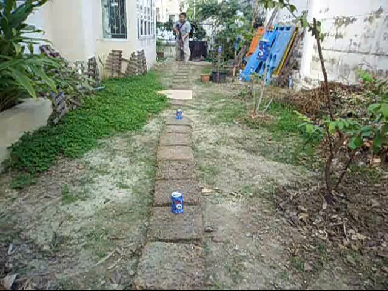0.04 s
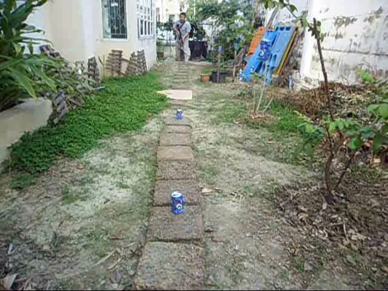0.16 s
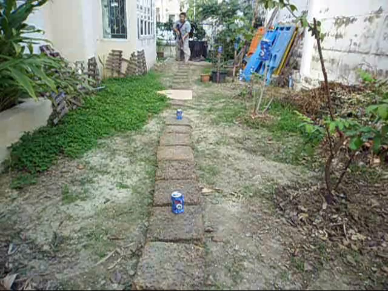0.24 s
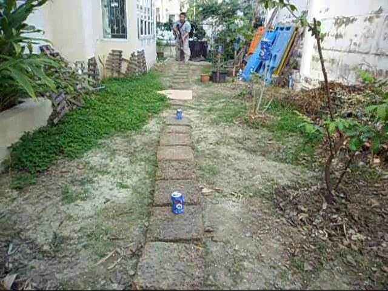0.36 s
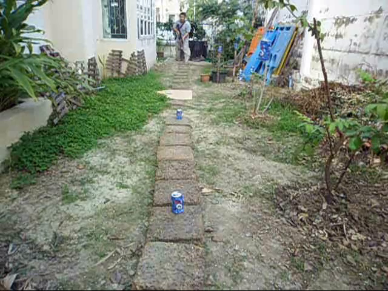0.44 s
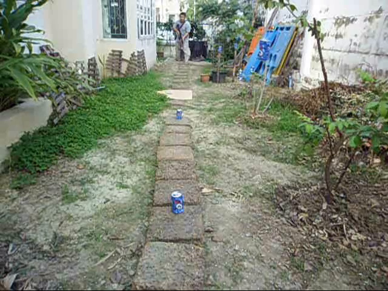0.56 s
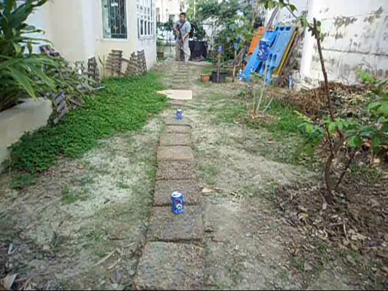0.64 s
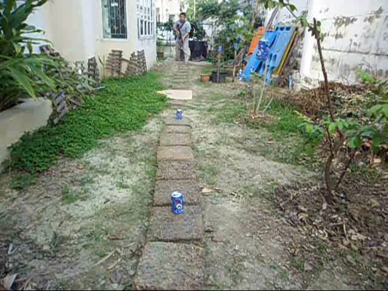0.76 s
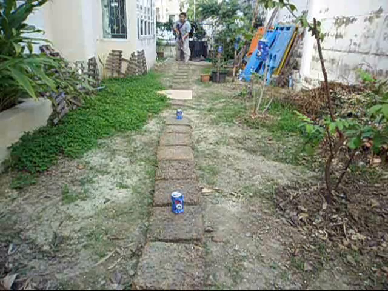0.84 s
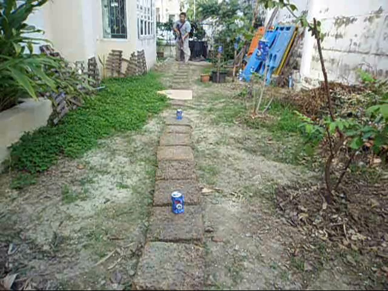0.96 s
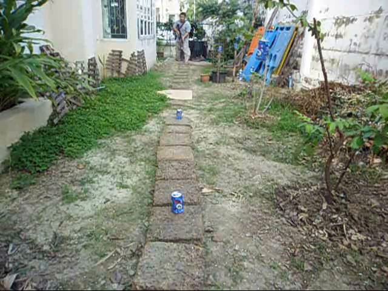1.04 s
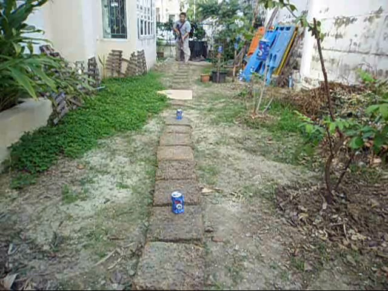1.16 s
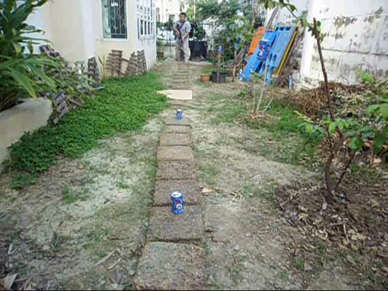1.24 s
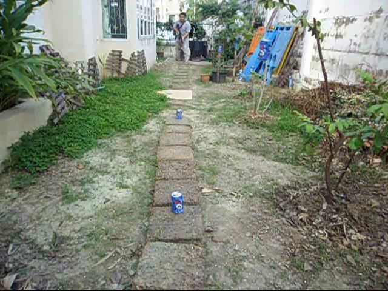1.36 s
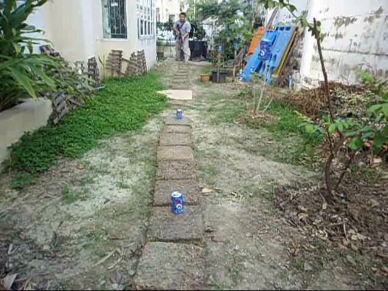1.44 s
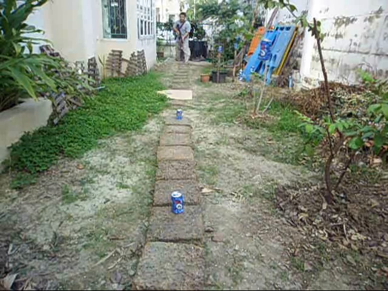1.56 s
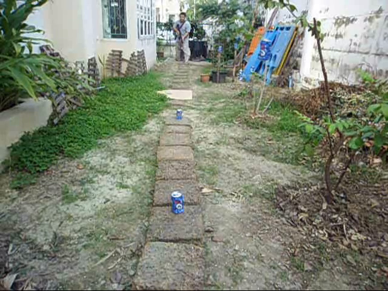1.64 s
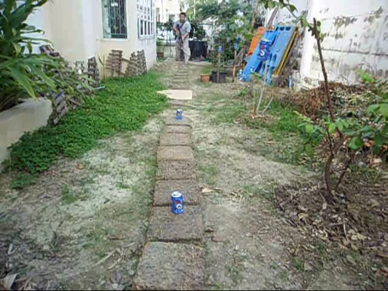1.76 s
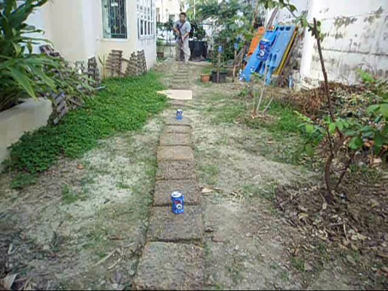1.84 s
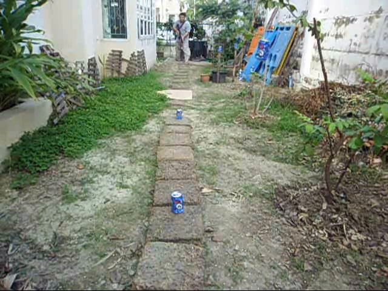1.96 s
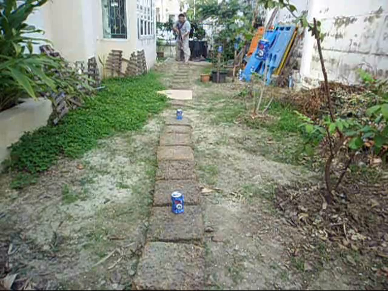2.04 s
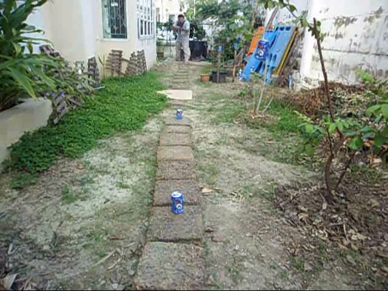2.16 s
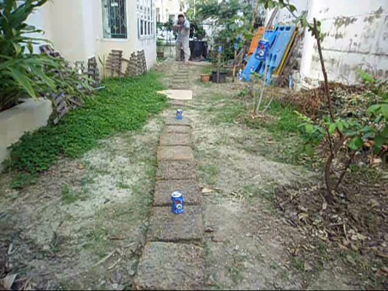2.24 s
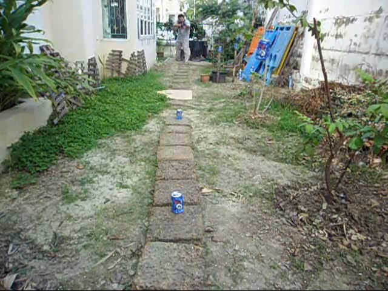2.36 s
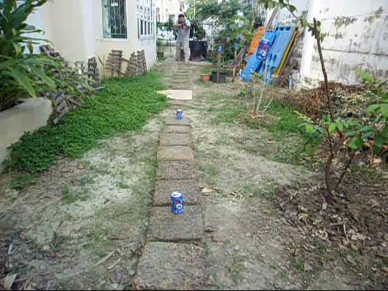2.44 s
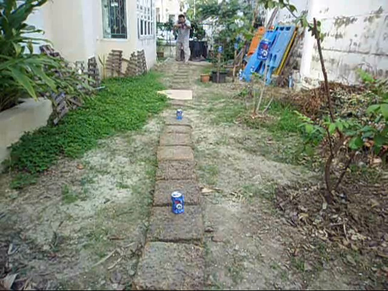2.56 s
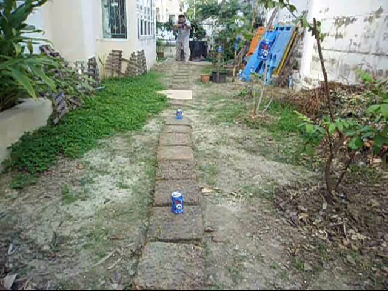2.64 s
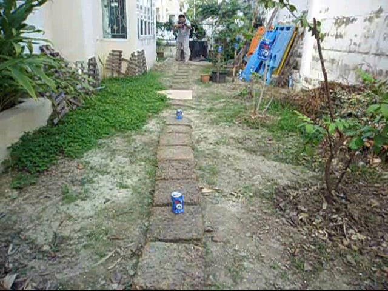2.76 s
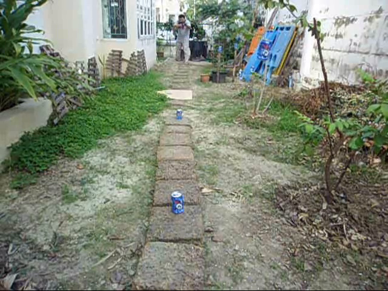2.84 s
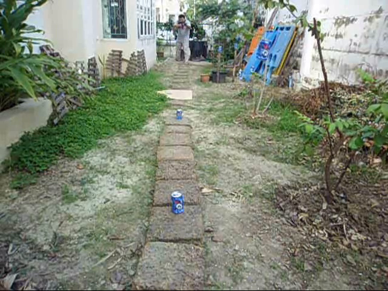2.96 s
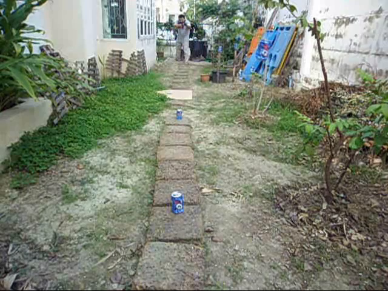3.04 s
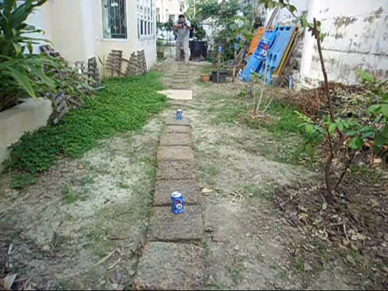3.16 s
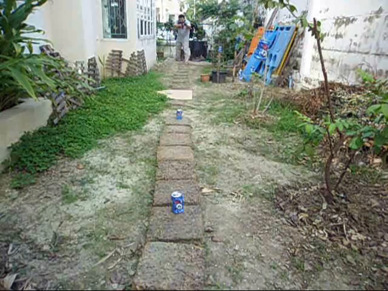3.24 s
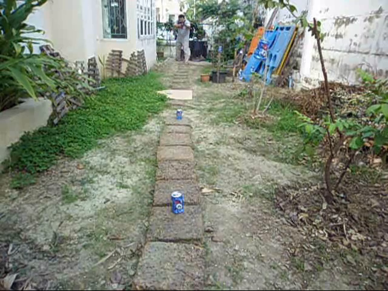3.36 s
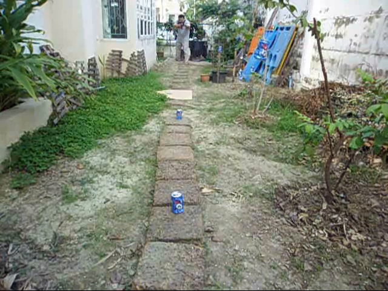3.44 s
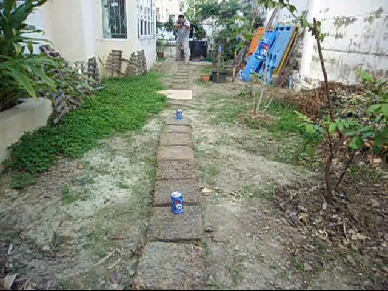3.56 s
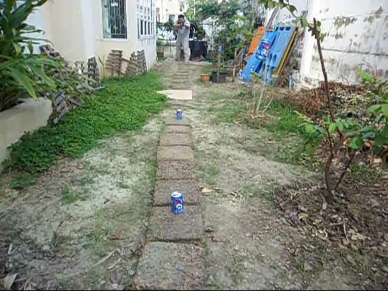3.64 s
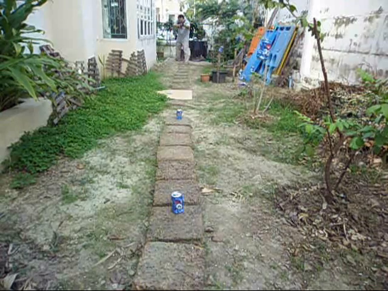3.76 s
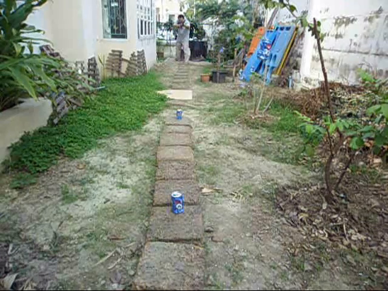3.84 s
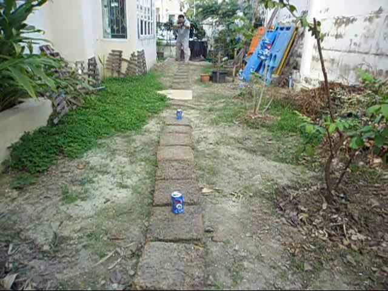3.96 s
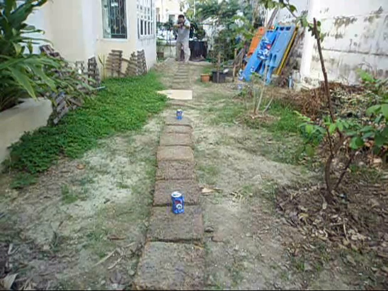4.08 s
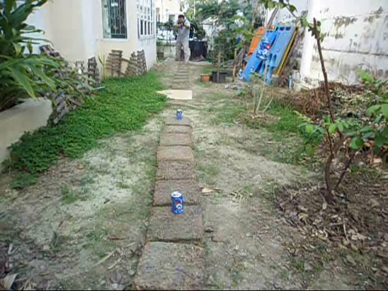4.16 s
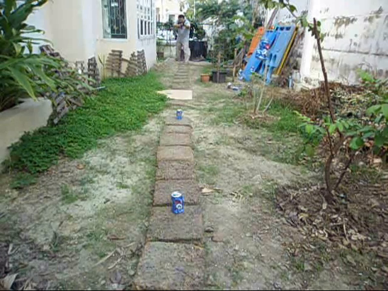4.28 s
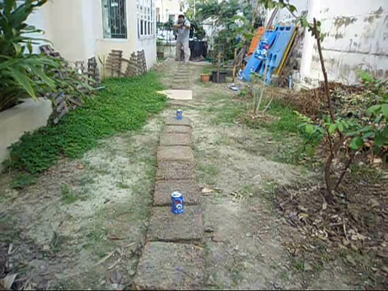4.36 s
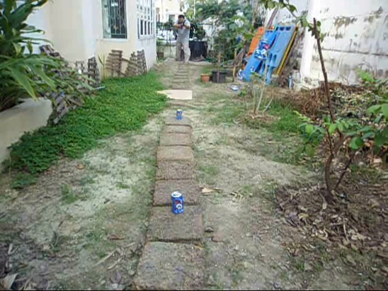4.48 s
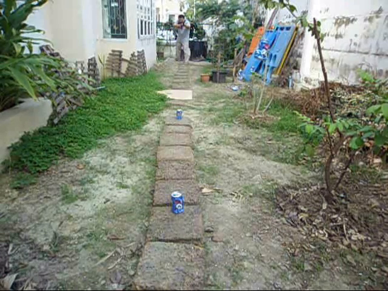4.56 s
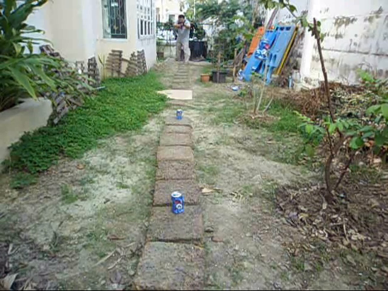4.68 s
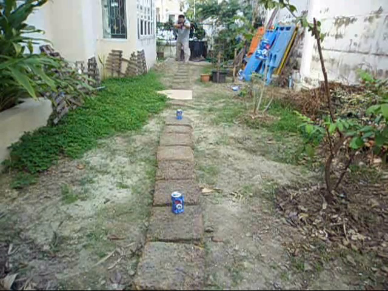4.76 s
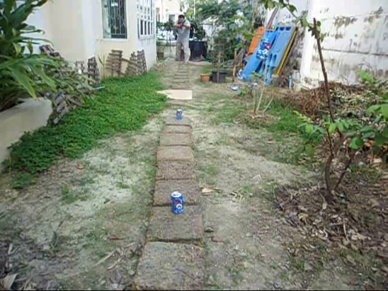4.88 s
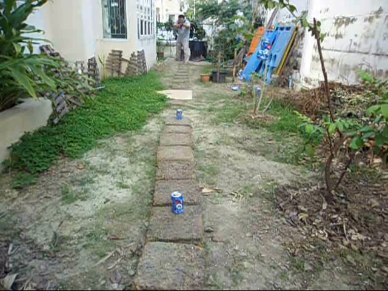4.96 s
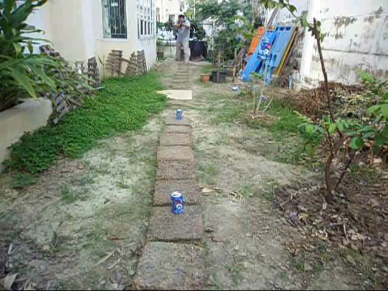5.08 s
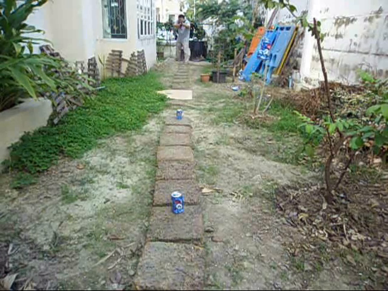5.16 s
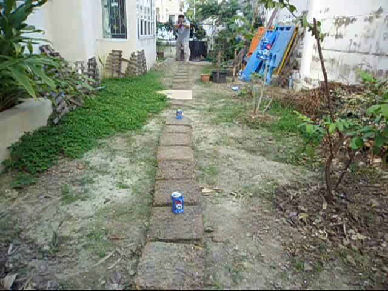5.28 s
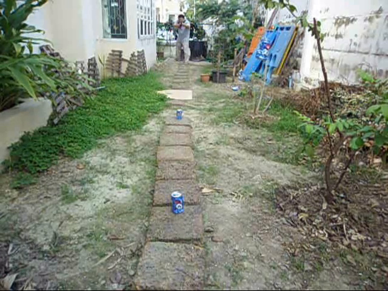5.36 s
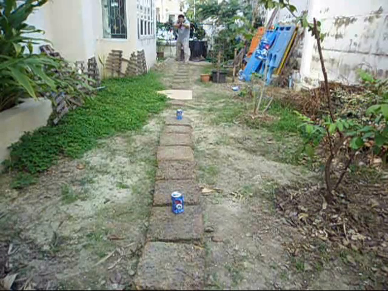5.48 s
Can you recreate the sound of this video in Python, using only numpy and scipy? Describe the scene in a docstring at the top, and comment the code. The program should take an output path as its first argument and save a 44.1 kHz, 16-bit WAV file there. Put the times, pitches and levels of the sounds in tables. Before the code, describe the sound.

A steady low hum with a thin distant whirr and faint rumble fills a quiet yard. Quiet handling follows: sliding cloth, one creak, tiny high clinks. From past three seconds come five loud, spaced airsoft shots, with pellets cracking against cans and boards almost at once after the first four, and loose tinny clatter. Short echoes bounce off walls; the mono sound is gritty, overloaded and harsh in the treble.

```python
"""A machine hums nearby, with a thin far whirr, a low rumble and outdoor air, all filtered noise and wavering tones.
As an electric airsoft rifle is raised, cloth rustles, the strap creaks and the sling buckle clinks.
Then come five single shots down a narrow yard: gear noise swells as the motor winds the spring, the piston slams,
pellets smack cans and boards after the first four, knocked cans clatter, and the walls ring on as decaying noise.
A cheap mono recorder overloads on the loud blows and mirrors its treble."""
import sys
import numpy as np
from scipy import signal
from scipy.io import wavfile
from scipy.ndimage import uniform_filter1d

SR = 44100
rng = np.random.default_rng(int(sys.argv[2]) if len(sys.argv) > 2 else 0)


def ratio(d):
    """dB to gain"""
    e = np.asarray(d, float) / 20
    return 10 ** e


def put_to_file(sound):
    """Save the sound as 16-bit audio at rate SR, in the file named by the first command-line argument."""
    columns = np.atleast_2d(sound).T  # one column per channel
    safe = np.clip(columns, -1, 1)
    whole_steps = np.round(safe * 32767)
    wavfile.write(sys.argv[1], SR, whole_steps.astype(np.int16))


N = 242991   # length [samples]

# The four blow tables share their columns, levels before the boost of their kind:
# (time [s], level [dB], brightness [dB per octave], wall echo [dB], favoured ring [Hz])
# piston slams
SLAMS = [(3.328, 3, 5, 0, 4570), (3.857, -1.5, 7.5, 1.5, 5800), (4.301, 1, 2, -3, 4270),
         (4.723, 8, 4.5, -12.5, 6000), (5.481, 2, 2.5, -5, 4900)]
# pellet strikes
STRIKES = [(3.348, 4.5, 2.5, -5.5, 1260), (3.875, 5.5, 2.5, -2.5, 3800), (4.342, -3.5, 3, -5, 3400),
           (4.752, 5.5, 1.5, -3.5, 1630)]
# knocked cans clattering
CLATTER = [(3.585, -9, 6, -17, 2300), (3.619, -15, 9, -30, 5400), (3.639, -11, 6, -1.5, 2600),
           (3.66, -18, -4.5, -5.5, 3170), (3.779, -4, 0.5, -4, 890), (3.786, -3, 3.5, -1, 3900),
           (3.821, -4.5, 2, -19, 5700), (4.328, -12, -6.5, -15, 1600), (4.385, -23, -7, -1, 3400),
           (4.612, -13.5, 0.5, 0, 1066), (5.176, -12, 5, -3, 2110), (5.239, -15.5, -7, -3.5, 980)]
# sling buckle clinks
CLINKS = [(2.357, -29.5, 7.5, -15, 3500), (2.402, -31, -2, -8, 6700), (2.622, -37, 1.5, -12, 5200),
          (2.795, -45, -6, 1, 4520), (2.866, -37, 4, -18, 7200)]
# motor winding before each slam: (start [s], whine peak [dB])
TRIGGERS = [(3.265, -22.5), (3.795, -17), (4.244, -27), (4.655, -38), (5.414, -40)]
# spectrum of any blow: (frequency [Hz], relative level per Hz [dB])
BLOW_SPECTRUM = [(59, -33), (100, -20), (110, -19.5), (120, 12), (155, -27), (482, -12.5), (1220, -5.5),
                 (1860, -9.5), (2840, -10), (3470, -7), (5380, -11.5), (7900, -12), (10300, -44),
                 (17400, -120)]
# wall echo decay: (frequency [Hz], t60 [s])
YARD_T60 = [(150, 0.56), (400, 0.54), (1040, 0.74), (2760, 0.56), (7280, 0.34)]
# ringing modes of the rifle: (frequency [Hz], relative level [dB], t60 [s])
RIFLE_MODES = [(985, -29, 0.078), (2420, 2, 0.011), (4200, -18, 0.023), (4638, 5, 0.078), (5400, 1, 0.013),
               (6200, -33, 0.096), (7750, -14, 0.077)]
# ringing modes of the cans: (frequency [Hz], relative level [dB], t60 [s])
CAN_MODES = [(376, -14, .2), (770, -4, 0.21), (926, -2, 0.54), (1015, -2.5, 0.24), (1220, -2, 0.24),
             (1359, 0, 0.11), (1410, -6, 0.22), (1569, -2.5, 0.067), (1767, 0.5, 0.11), (2005, -1, 0.26),
             (2270, 0, 0.18), (2600, -11, 0.39), (3134, -2.5, 0.29), (3400, -3, 0.16), (3350, -16, 0.18),
             (3770, -6, 0.26), (4000, -19, .12), (4340, -1, 0.18), (4800, -10, 0.26), (5220, 5, 0.072),
             (5610, 7, .1), (5470, -1, 0.11), (7100, -20, .1)]
# ringing modes of the buckle: (frequency [Hz], relative level [dB], t60 [s])
BUCKLE_MODES = [(3143, 5.5, 0.065), (4470, 5, 0.053), (4910, -2, .06), (5800, -14, 0.065), (7000, 8, .08),
                (7600, 1, .05)]
# gear housing resonances: (frequency [Hz], width [Hz], relative level [dB])
GEAR_MODES = [(1230, 1300, -10), (2300, 150, -4.5), (3250, 570, -3.5), (4480, 340, 0.5), (5230, 280, -3),
              (7100, 870, -11)]
# cloth strokes: (time of peak [s], peak [dB], rise [s], t60 [s])
CLOTH_STROKES = [(2.17, -34, 0.058, 0.75), (2.358, -43.5, .01, .4), (2.408, -46.5, .015, 0.4),
                 (2.542, -45, 0.076, 0.78), (2.65, -42, 0.11, 1.3), (2.76, -48, .1, 1.4),
                 (2.87, -49, 0.11, 0.65)]
# cloth spectrum: (frequency [Hz], relative level per Hz [dB])
CLOTH_SPECTRUM = [(470, -17), (800, -3), (1110, -7), (1770, -9), (2450, -5.5), (4800, 0), (7250, -3),
                  (7900, -14), (10300, -44), (17400, -120)]
# strap creak: (time of peak [s], peak [dB], rise [s], t60 [s])
STRAP_CREAK = [(2.18, -43, 0.028, .25)]
# near machine hum: (time [s], frequency [Hz], level [dB])
HUM = [(0, 90.84, -30.5), (1.09, 93.15, -29.5), (1.55, 92.3, -31.5), (2.5, 93.2, -28.5), (3.2, 93.3, -29.5),
       (3.6, 93.3, -29.5), (4.1, 91.5, -27), (4.6, 92, -31.5), (5.51, 92.1, -27)]
# multiples in the hum: (multiple, relative level [dB])
HUM_ORDERS = [(1, 0.5), (2, -28.5), (4, -33.5), (6, -35), (8, -49)]
# the hum's fifth multiple: (time [s], level [dB])
HUM_FIFTH = [(0, -59), (.8, -56), (1.4, -74), (1.75, -49), (2.6, -54), (2.9, -58), (5.51, -46)]
# far motor whirr: (time [s], frequency [Hz], level [dB])
WHIRR = [(0, 213.5, -51.5), (1, 215.3, -50.5), (2.1, 217.2, -51), (2.35, 219.8, -52.5), (3.2, 216.8, -57.5),
         (4.2, 223.1, -56), (5.5, 212, -45.5)]
# multiples in the whirr: (multiple, relative level [dB])
WHIRR_ORDERS = [(1, -0.5), (2, -3), (3, -7), (4, -12), (5, -9), (7, -14), (9, -13.5)]
# low rumble: (time [s], level [dB])
RUMBLE = [(0, -30), (.25, -40), (.84, -36), (2.1, -40.5), (3.07, -45), (3.91, -36.5), (5.51, -39.5)]
# outdoor air spectrum: (frequency [Hz], relative level per Hz [dB])
AIR_SPECTRUM = [(32, -34), (55, -11.5), (100, -3.5), (121, -10.5), (140, -11), (159, -17), (221, -20),
                (290, -21), (430, -19), (519, -25), (1070, -25.5), (1170, -26.5), (5210, -36), (7900, -46),
                (10300, -86), (17400, -120)]
# third-octave band edges: (frequency [Hz])
BAND_EDGES = 20 * 2 ** np.arange(0, 8.7, 1 / 3)


def piston_slams():
    """The piston slams home and shakes the rifle's modes."""
    return blows(SLAMS, RIFLE_MODES, boost_db=5, bump_db=9.5, ring_db=-1.0, tick_db=-13.5,
                 attack_s=0.00022, rise_s=0.087, grain_db=2.0, burst_s=0.066)


def pellet_strikes():
    """Pellets smack their targets, a low bump from the recorder's overload under each, and set the can modes ringing."""
    return blows(STRIKES, CAN_MODES, boost_db=8.5, bump_db=26.5, ring_db=7, tick_db=-15.5,
                 attack_s=0.00044, rise_s=0.011, grain_db=1.0, burst_s=0.17)


def can_clatter():
    """Knocked cans clatter: softer attacks, strong ringing."""
    return blows(CLATTER, CAN_MODES, boost_db=-1.5, bump_db=6, ring_db=9.5, tick_db=-18.5,
                 attack_s=0.0024, rise_s=0.036, grain_db=2.0, burst_s=0.088)


def buckle_clinks():
    """Short knocks ring the small, high modes of the sling buckle."""
    return blows(CLINKS, BUCKLE_MODES, boost_db=3, bump_db=3, ring_db=15, tick_db=-15.0,
                 attack_s=0.00044, rise_s=.04, grain_db=2.0, burst_s=.03)


def blows(table, modes, boost_db, bump_db, ring_db, tick_db, attack_s, rise_s, grain_db, burst_s):
    """A gritty burst and wall echoes that die band by band shake the struck body's modes, over a low bump."""
    s, db, bright, echo_db, spot_hz = np.transpose(table)
    t = np.arange(N) / SR
    last = np.clip(np.searchsorted(s, t) - 1, 0, None)   # index of the latest blow
    age = np.maximum(t - s[last], 0)
    burst = ratio(-60 * age / burst_s) * (1 - np.exp(-age / attack_s))
    scatter = rng.normal(0, 1.65, (len(s), len(BAND_EDGES)))   # no two blows alike [dB]
    far_t60_s, far_db = 1.49, -22.5   # late echoes from distant buildings
    noise = np.zeros(N)
    for k, (hz, band) in enumerate(bands()):
        tilt_db = bright * np.log2(max(hz, 700) / 2500)
        level_db = db + boost_db + at_hz(BLOW_SPECTRUM, hz) + tilt_db + scatter[:, k]
        echoes = train(s, ratio(level_db + echo_db))
        walls = dying(echoes, at_hz(YARD_T60, hz)) - dying(echoes, rise_s)   # builds up, then dies
        far = ratio(far_db) * dying(echoes, far_t60_s)
        noise += band * (ratio(level_db)[last] * burst + walls + far)
    noise *= ratio(grain_db * drift(140))   # separate echoes arrive unevenly

    rings = np.zeros(N)
    for hz, mode_db, t60 in modes:
        near_db = -np.minimum(22 * np.log2(hz / spot_hz) ** 2, 12)   # the spot struck favours some modes
        wander = ratio(1.7 * drift(42))   # each mode's strength wanders at random
        shaking = noise * ratio(ring_db + mode_db + near_db)[last] * wander
        undo_gain = t60 * SR / (2 * np.log(1000))   # a narrow resonance barely answers a click
        contact = train(s, ratio(db + tick_db + mode_db + near_db) * undo_gain)
        rings += resonate(shaking + contact, hz, np.log(1000) / np.pi / t60)
    clicks = train(s, ratio(db + bump_db + 1.5))
    low_bump = resonate(resonate(clicks, 210, 270), 230, 500)
    return noise + rings + low_bump


def gearbox():
    """Uneven tooth contacts excite the gear housing while the spring is wound; the pinion whines."""
    start_db, end_db, curve = -41.5, -22, 0.66   # gear noise swells with spring load
    peak_s, rise_db_per_s, fall_db_per_s = .025, 1500, 650   # whine, after the trigger
    t, gear, whining = np.arange(N) / SR, 0, 0
    for (start, whine_db), (slam, *_) in zip(TRIGGERS, SLAMS):
        load = np.clip((t - start) / (slam - start), 0, 1)
        winding = (t > start) & (t < slam)
        late = t - start - peak_s
        gear = gear + winding * ratio(start_db + (end_db - start_db) * load ** curve)
        whine_shape_db = np.minimum(rise_db_per_s * late, -fall_db_per_s * late)
        whining = whining + winding * ratio(whine_db + whine_shape_db)
    teeth = rng.standard_normal(N) * ratio(1.0 * drift(120))
    housing = 0
    for k, (hz, width, db) in enumerate(GEAR_MODES):
        housing = housing + (-1) ** k * ratio(db) * resonate(teeth, hz, width)   # alternate polarity
    whine_hz, width_hz = 5190, 51
    whine = resonate(resonate(teeth, whine_hz, width_hz), whine_hz, width_hz)
    return gear * rms_one(housing) + whining * rms_one(whine)


def handling():
    """Cloth slides as flickering noise and the strap creaks once, a narrow resonance of noise."""
    cloth = swells(CLOTH_STROKES) * coloured(CLOTH_SPECTRUM, patchy_db=1.5)
    creak = rms_one(resonate(rng.standard_normal(N), hz=1720, width_hz=93))
    return cloth + swells(STRAP_CREAK) * creak


def machines():
    """A strong near hum and a thin far whirr from running-speed multiples; traffic-like rumble from low noise."""
    hz, db = in_time(HUM)
    hum = tone(hz, db, HUM_ORDERS, waver_db=1.0)
    fifth = tone(hz, in_time(HUM_FIFTH)[0], [(5, 0)], waver_db=4.0)
    whirr = tone(*in_time(WHIRR), WHIRR_ORDERS, waver_db=2.5)
    low_band = signal.butter(3, [22, 46], "band", fs=SR, output="sos")
    rumble = rms_one(signal.sosfilt(low_band, rng.standard_normal(N)))
    return hum + fifth + whirr + ratio(in_time(RUMBLE)[0] + 1.8 * drift(4.0)) * rumble


def outdoor_air():
    """Steady low-weighted noise of the open air."""
    return ratio(-40.5) * coloured(AIR_SPECTRUM, patchy_db=0.3)


def tone(hz, db, orders, waver_db):
    """Multiples of a running speed, each wavering in level."""
    phase = 2 * np.pi * np.cumsum(hz) / SR
    total = 0
    for k, order_db in orders:
        total = total + ratio(db + order_db + waver_db * drift(4.6)) * np.sin(k * phase + k)
    return np.sqrt(2) * total   # levels are rms


def swells(rows):
    """Each row swells smoothly to its peak and dies away; powers add."""
    t, power = np.arange(N) / SR, 0
    for s, db, rise, t60 in rows:
        fall = ratio(db - 60 * np.maximum(t - s, 0) / t60)
        power = power + (fall * np.clip(1 + (t - s) / rise, 0, 1) ** 2) ** 2
    return np.sqrt(power)


def coloured(spectrum, patchy_db):
    """Noise of a given spectrum whose bands flicker; rms 1."""
    return rms_one(sum(ratio(at_hz(spectrum, hz) + patchy_db * drift(6.8)) * band for hz, band in bands()))


def bands():
    """Third-octave bands of white noise with their centres; neighbours are unrelated."""
    white = rng.standard_normal((2, N))
    for k, (low, high) in enumerate(zip(BAND_EDGES, BAND_EDGES[1:])):
        sos = signal.butter(2, [low, high], "band", fs=SR, output="sos")
        yield np.sqrt(low * high), signal.sosfilt(sos, white[k % 2])


def resonate(x, hz, width_hz):
    """One resonance, gain 1 on top."""
    r = np.exp(-np.pi * width_hz / SR)
    feedback = [1, -2 * r * np.cos(2 * np.pi * hz / SR), r * r]
    return signal.lfilter((1 - r * r) / 2 * np.array([1, 0, -1]), feedback, x)


def train(times, sizes):
    """Clicks at the given times."""
    clicks = np.full(N, 1e-18)
    clicks[np.round(times * SR).astype(int)] = sizes
    return clicks


def dying(clicks, t60):
    """Each click starts an exponential fall."""
    return signal.lfilter([1], [1, -ratio(-60 / (t60 * SR))], clicks)


def drift(rate_hz):
    """Slow random wander of spread 1: noise through two lowpass poles at rate_hz."""
    hop = 40   # drawn on every 40th sample, then joined by lines
    r = np.exp(-2 * np.pi * hop * rate_hz / SR)
    draws = rng.standard_normal(N // hop + 2002)
    slow = signal.lfilter([1], [1, -2 * r, r * r], draws)[2000:]   # skip the settling
    return np.interp(np.arange(N) / hop, np.arange(len(slow)), rms_one(slow))


def in_time(rows):
    """Columns of a curve at every sample."""
    s, *columns = np.transpose(rows)
    return [np.interp(np.arange(N) / SR, s, c) for c in columns]


def at_hz(points, hz):
    """Read a spectrum on a log axis."""
    return np.interp(np.log(hz), np.log(np.array(points)[:, 0]), np.array(points)[:, 1])


def rms_one(x):
    """Scale to rms 1."""
    return x / np.sqrt(np.mean(x ** 2) + 1e-20)


def scene():
    """Rifle, cans, cloth, machines and outdoor air, heard by one microphone."""
    impacts = piston_slams() + pellet_strikes() + can_clatter() + buckle_clinks()
    mono = impacts + gearbox() + handling() + machines() + outdoor_air()
    return np.tile(mono, (2, 1))


def roll_off(x):
    """The treble ends steeply here."""
    return signal.sosfilt(signal.butter(12, 15530, fs=SR, output="sos"), x)


def record(dry):
    """Peaks clip, slow sampling holds steps that mirror the spectrum about half the rate, a top cut, peaks clip again."""
    sample_hz, hiss_db, step_noise_db = 16000, -65, -17
    cut = signal.sosfilt(signal.cheby1(8, .5, 7600, fs=SR, output="sos"), dry[0])
    sampled = signal.resample_poly(np.clip(cut, -.95, .95), 160, 441)   # SR to sample_hz
    held = sampled[(np.arange(N) * sample_hz // SR).astype(int)]
    # coarse adaptive steps: the rounding noise follows how fast the wave moves
    busy = np.sqrt(uniform_filter1d(np.gradient(np.clip(cut, -1, 1)) ** 2, size=220))
    noise_level = ratio(hiss_db) + ratio(step_noise_db) * busy
    noisy = held + noise_level * rng.standard_normal(N)
    top_cut = signal.sosfilt(signal.ellip(10, .3, 60, 15400, fs=SR, output="sos"), noisy)
    mix = np.tile(np.clip(ratio(0.19) * top_cut, -1, 1), (2, 1))
    return roll_off(mix)


dry = scene()
out = record(dry)
put_to_file(out)
```